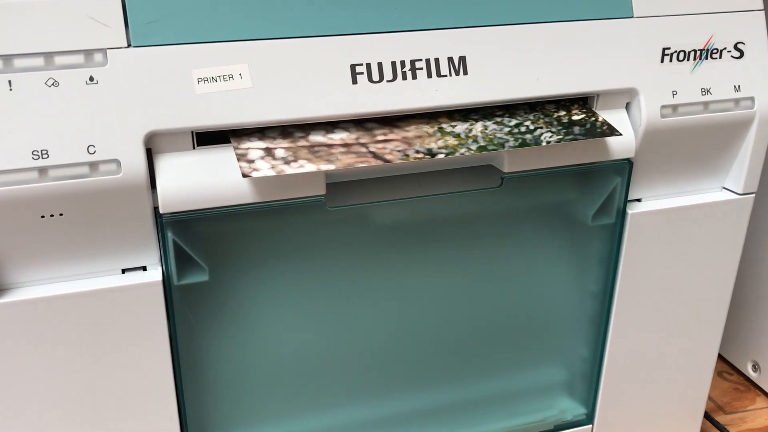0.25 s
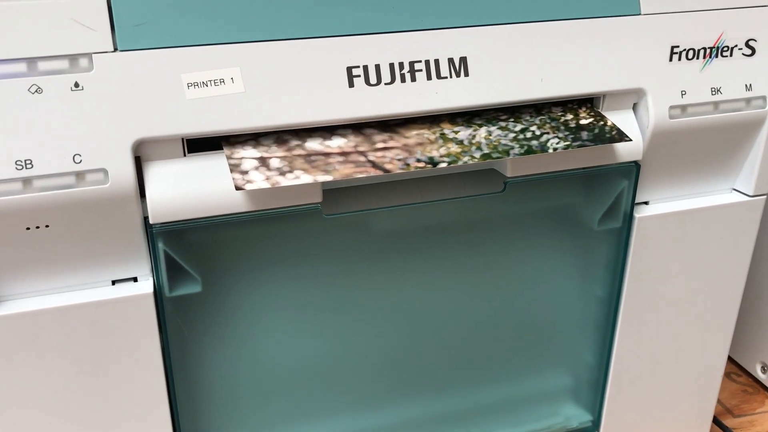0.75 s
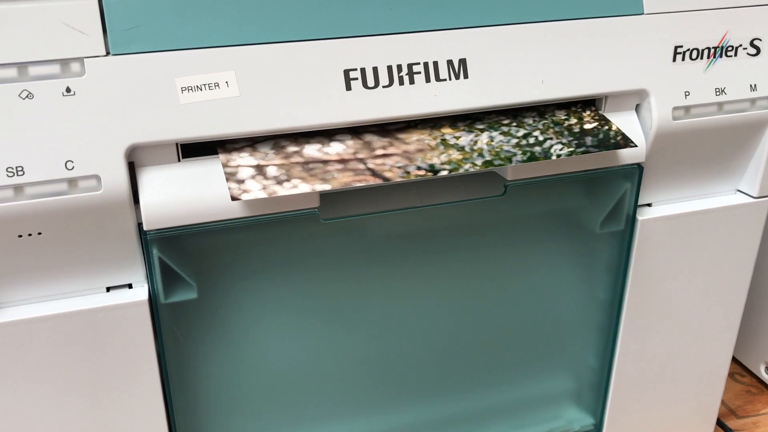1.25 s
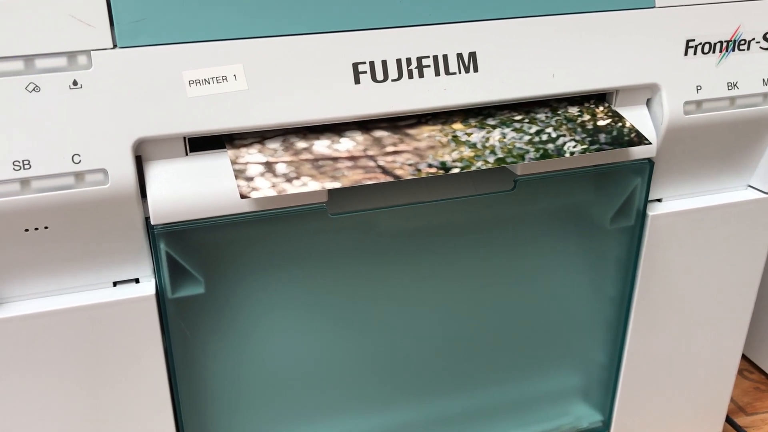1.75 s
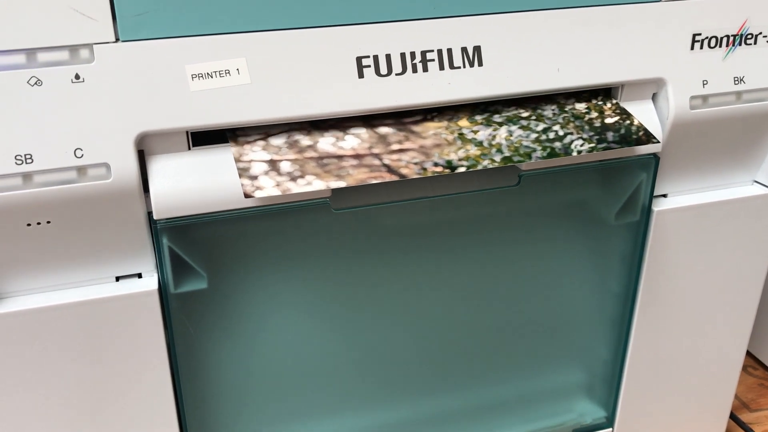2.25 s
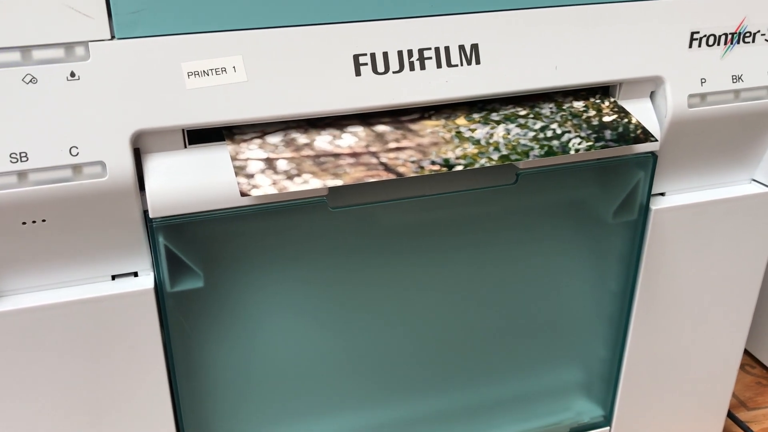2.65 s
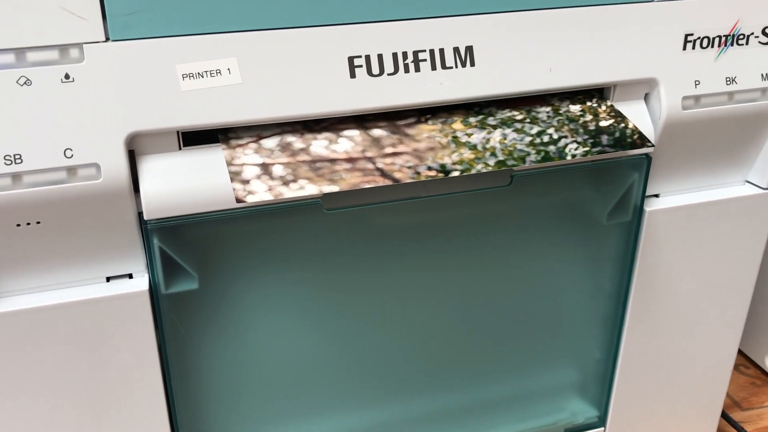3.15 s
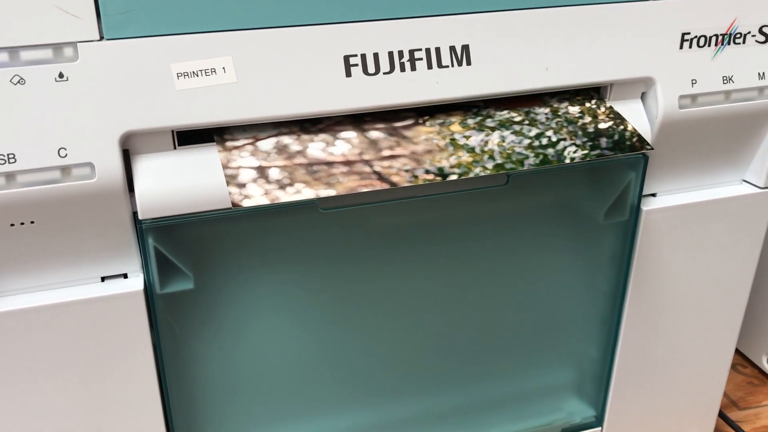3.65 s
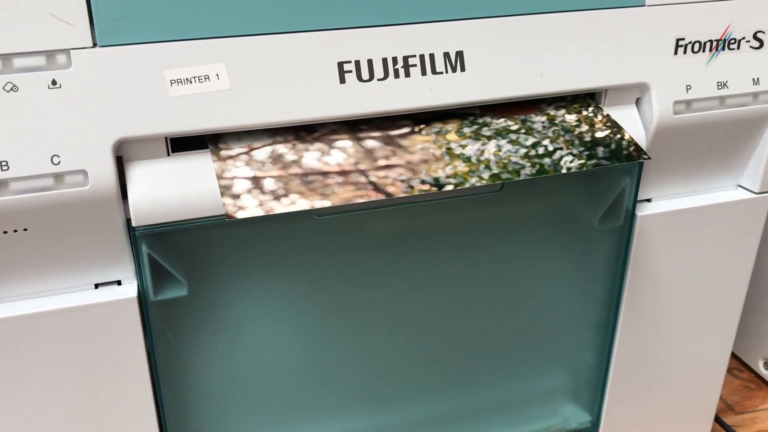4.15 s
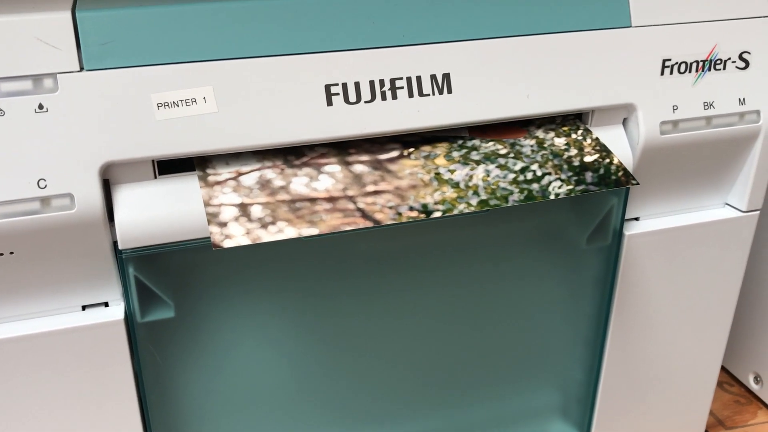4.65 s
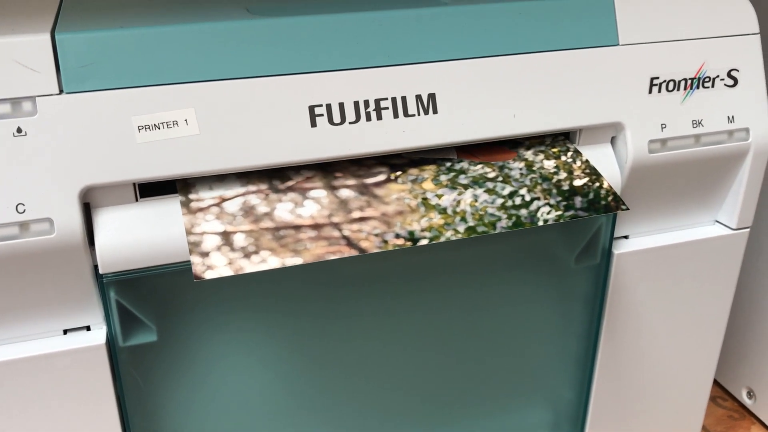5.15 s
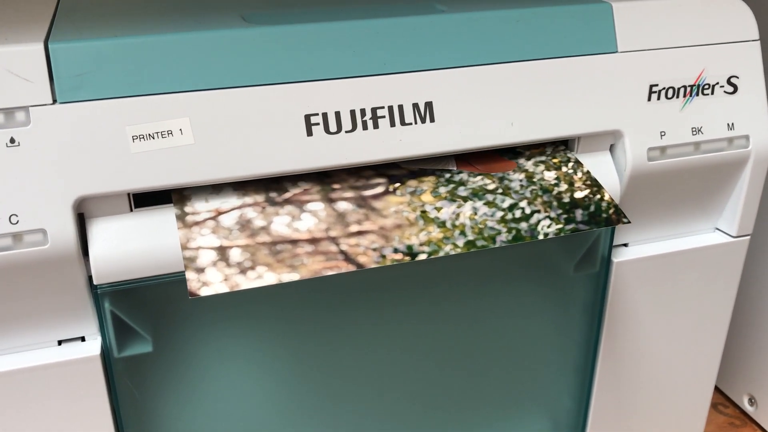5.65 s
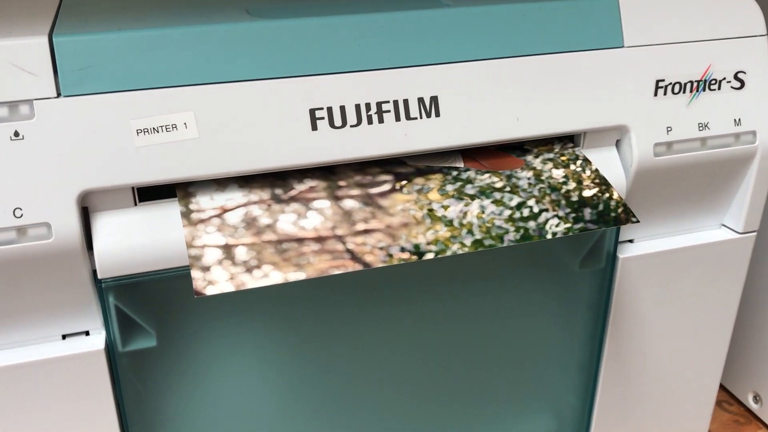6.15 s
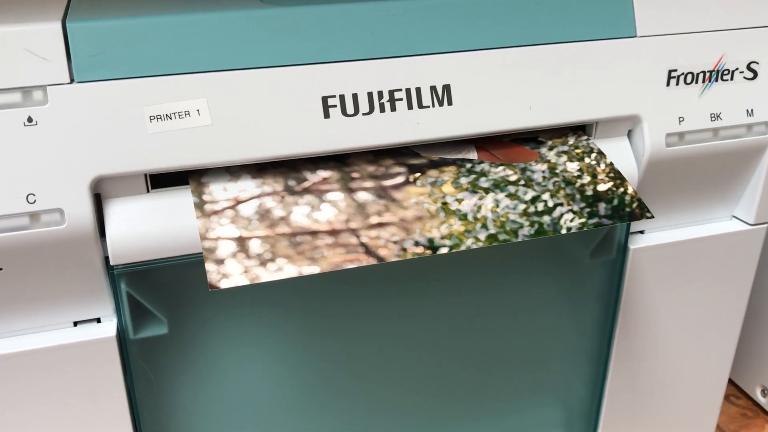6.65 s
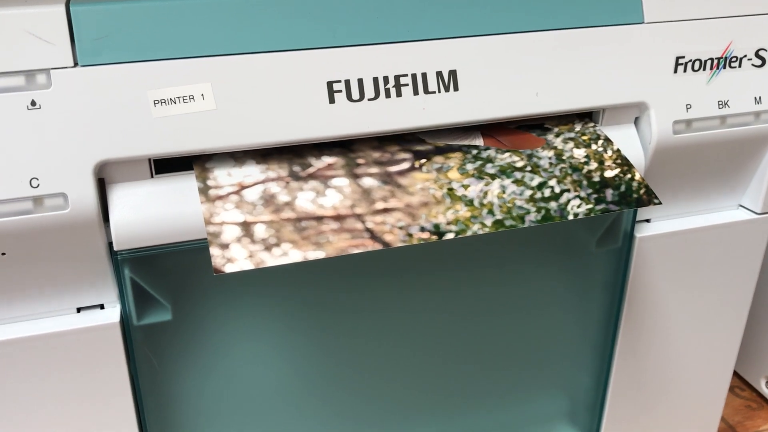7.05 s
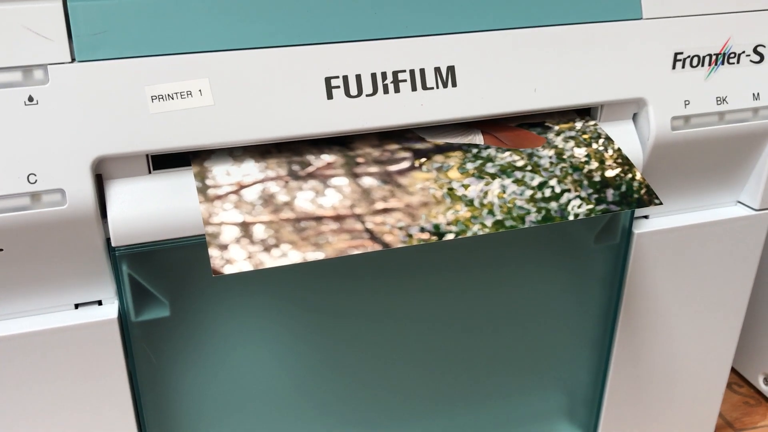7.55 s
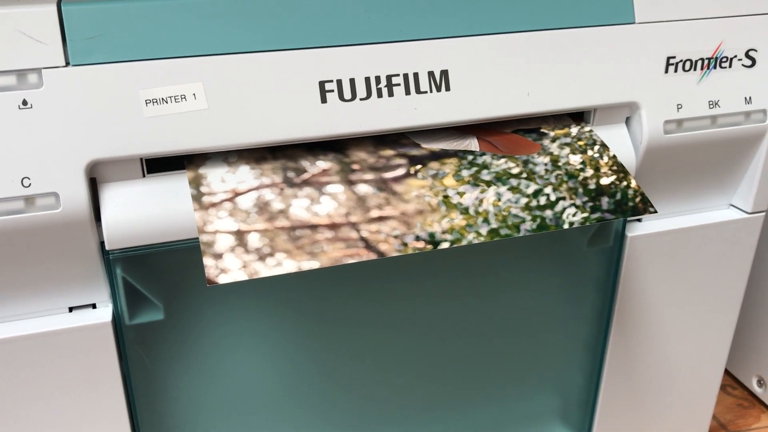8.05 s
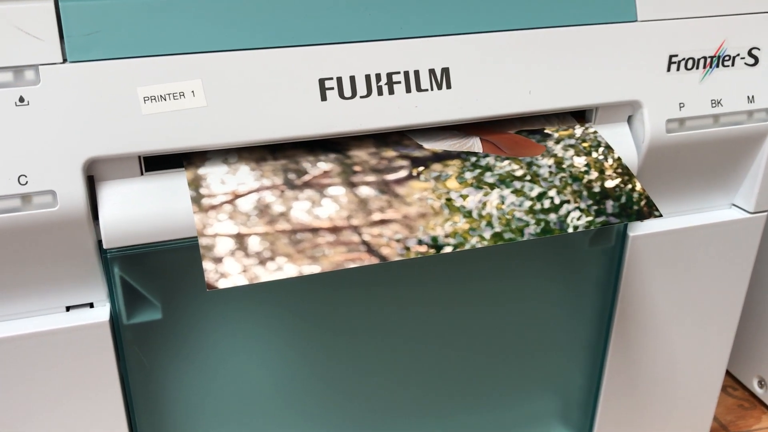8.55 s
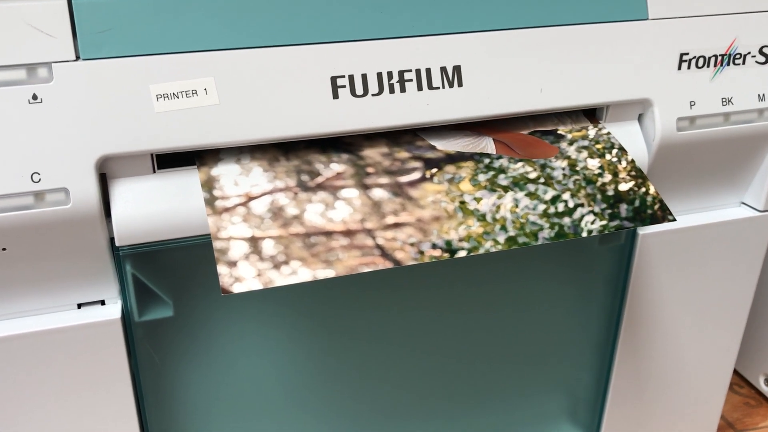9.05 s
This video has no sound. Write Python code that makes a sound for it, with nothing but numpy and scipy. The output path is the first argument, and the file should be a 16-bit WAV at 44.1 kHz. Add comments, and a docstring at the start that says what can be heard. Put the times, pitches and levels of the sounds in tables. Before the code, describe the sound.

A photo printer runs close to the microphone in a small room, already working at 0 s and continuing to the end at about 9.3 s. Two fans of almost equal speed give a low hum near 200 Hz and a fluttering, slightly beating whine near 1 kHz, surrounded by rushing air and fine hiss. The whine gets clearly stronger at about 1.6 s, and an airy high sheen grows until about 6 s. From 0.13 s, every 0.55 s, comes a very short grainy swish, then within a moment a faint bright tick of varying strength and a soft low thud with a rattle. Swishes are strongest around 4.6 s. From about 5.3 s a very low drone, like a distant engine, swells under the machine, climbs in pitch until about 7 s, drops back and fades by about 8.5 s, leaving the steady printing cycle.

```python
"""Inkjet photo printer, close up

Two cooling fans of nearly equal speed hum and whine as sums of sines; filtered noise is their rush of air.
About twice a second, as each head pass ends, come a short swish, a light tick and the soft thud of a paper
step: enveloped noise, with decaying sines for the tick. In the second half a low drone like a distant
engine, two gliding notes over a rumble, swells, climbs in pitch and fades."""
import sys
import numpy as np
from scipy import signal
from scipy.fft import rfft, irfft, next_fast_len
from scipy.io import wavfile
from scipy.ndimage import map_coordinates

SR = 44100
rng = np.random.default_rng(int(sys.argv[2]) if len(sys.argv) > 2 else 0)


def output_pcm(signal):
    """Save a mono or channel-first signal as 16-bit PCM at the path in sys.argv[1].

    Samples are clipped to [-1, 1] before scaling.
    """
    pcm = np.clip(np.atleast_2d(signal).T, -1, 1) * 32767
    wavfile.write(sys.argv[1], SR, np.round(pcm).astype(np.int16))


N = 410130
TIME = np.arange(N) / SR  # s


def from_db(db):
    """Turn decibels into gain."""
    return 10 ** (np.asarray(db) / 20)


def drift(rate):
    """Slow random wander with about `rate` changes a second, zero mean and spread 1."""
    hz = np.fft.rfftfreq(N, 1 / SR)
    lowpass = 1 / (1 + (hz / rate) ** 2) ** 2
    slow = irfft(rfft(rng.standard_normal(N)) * lowpass, N)
    return (slow - slow.mean()) / slow.std()


def tone(cycles, db):
    """A sine of given rms level that starts anywhere in its cycle."""
    phase = 2 * np.pi * (cycles + rng.random())
    return np.sqrt(2) * from_db(db) * np.sin(phase)


def lift(hz, resonances):
    """Decibels that bell-shaped resonances add at a frequency."""
    total_db = 0
    for centre, width, lift_db in resonances:
        distance = 2 * (hz - centre) / width
        total_db = total_db + lift_db * np.exp2(-np.minimum(distance ** 2, 20))
    return total_db


def noise(spectrum, resonances=()):
    """Noise of a given density, lifted or dipped by bell-shaped resonances."""
    size = next_fast_len(N)
    hz = np.maximum(np.fft.rfftfreq(size, 1 / SR), 1)
    points, levels = np.transpose(spectrum)
    db = np.interp(np.log(hz), np.log(points), levels)
    # beyond both ends of the table the level falls 20 dB an octave
    octaves_outside = np.abs(np.log2(hz / np.clip(hz, points[0], points[-1])))
    db = db - 20 * octaves_outside + lift(hz, resonances)
    shaped = irfft(rfft(rng.standard_normal(size)) * from_db(db), size)[:N]
    return shaped * np.sqrt(SR / 2)  # white noise at 0 dB per Hz before shaping


def bursts(events, rise_s, fall_s):
    """An envelope that rises and dies away after each event; the event level sets its peak."""
    envelope = np.zeros(N)
    age = np.arange(SR // 2) / SR
    shape = (1 - np.exp(-(age / rise_s) ** 2)) * np.exp(-age / fall_s)
    shape = shape / shape.max()
    for s, db in events:
        part = envelope[max(round(s * SR), 0):][:len(age)]
        part += from_db(db) * shape[:len(part)]
    return envelope


def in_time(rows):
    """Join the second column of a table over its times by straight lines."""
    seconds, values = np.transpose(rows)
    return np.interp(TIME, seconds, values)


# Whine as the vent faces the listener more or less openly; only the swing about its mean is used:
# (t/s, level/dB)
VENT_FACING = [(0.0, -47.5), (0.39, -46), (1.58, -46.5), (1.66, -42.5), (4.84, -42), (5.39, -40.5),
               (9.3, -41.5)]


def vent_swing():
    """Swing in dB of the whine as the vent turns towards or away from the listener."""
    whine_db = in_time(VENT_FACING)
    return whine_db - whine_db.mean()


# Tones of each five-bladed fan, rms before the vent swing and flutter:
# (multiple of the rotation rate, level/dB)
REAR_FAN_TONES = [(1, -47.5), (2, -68.5), (4, -67), (5, -49), (8, -65.5), (12, -66.5), (15, -69),
                  (16, -68.5)]
FRONT_FAN_TONES = [(1, -60), (5, -42), (8, -67), (10, -95), (12, -60.5), (15, -81), (16, -82), (20, -69)]
REAR_FAN_HZ, FRONT_FAN_HZ = 195.42, 202.03  # rotation rates


def fan(turn_hz, tones, whine_db, wander_turns, flutter_db):
    """Imbalance hums once a turn through the case; blades and motor whine out of the vent."""
    turns = turn_hz * TIME + wander_turns * drift(2.7)
    vent_db = whine_db + flutter_db * drift(7.7)
    out = np.zeros(N)
    for multiple, db in tones:
        through_vent = multiple > 2
        out += tone(multiple * turns, db + (vent_db if through_vent else 0))
    return out


# Faint steady tones of the drive, rms: (f/Hz, level/dB)
DRIVE_TONES = [(475.5, -70.5), (496, -63.5)]


def drive_tones():
    """The drive sings on faint sines whose phases wander a little."""
    return sum(tone(hz * TIME + 0.096 * drift(2.1), db) for hz, db in DRIVE_TONES)


def front_panel(x, lag_ms, sway_ms, echo_db):
    """A reflection off the front panel ripples the hiss as the listening point sways."""
    lag_s = (lag_ms + sway_ms * drift(.3)) / 1000
    echo = map_coordinates(x, [(TIME - lag_s) * SR], order=3)
    return x + from_db(echo_db) * echo


# Air rushing through the case, before swing and flutter: (f/Hz, level/dB per Hz)
RUSH = [(300, -92.5), (520, -84), (600, -80.5), (660, -74), (950, -69.5), (1100, -75), (1320, -82),
        (2100, -86.5), (3000, -89.5), (5000, -100)]
# Air resonances of the case: (f/Hz, width/Hz, lift/dB)
CAVITIES = [(685, 88, 5.5), (812, 46, 4.5), (1000.4, 68, 6.5), (1061, 56, 9), (1140, 25, -5), (1179, 91, 6),
            (1235, 45, 3.5), (1478, 204, 6), (1764, 78, 3.5), (1897, 74, 6), (2495, 150, 6),
            (2792, 91, 8.5)]
# Fine hiss at the grille, before the panel reflection: (f/Hz, level/dB per Hz)
HISS = [(1500, -105), (2900, -90), (3600, -88), (4500, -87.5), (5200, -90.5), (7400, -91.5), (8500, -95.5),
        (10500, -99), (12600, -99), (15700, -104)]
# Colour of the grille: (f/Hz, width/Hz, lift/dB)
GRILLE = [(3290, 140, -18), (3664, 190, 4), (4300, 61, 4.5), (5070, 120, -5), (5200, 130, 4),
          (5880, 250, -1.5), (6360, 350, -0.5), (8400, 450, 1), (10500, 500, -2)]
# Airy sheen beamed out of the paper slot, once fully up: (f/Hz, level/dB per Hz)
SHEEN = [(6000, -108), (10000, -111)]
# Resonances of the slot: (f/Hz, width/Hz, lift/dB)
SLOT = [(6400, 460, 17), (7260, 400, 17.5), (9570, 620, 13.5)]
# Low murmur of the machine and room: (f/Hz, level/dB per Hz)
MURMUR = [(20, -104), (35, -84), (52, -73.5), (75, -75), (98, -74.5), (125, -72.5), (160, -79), (200, -71),
          (255, -81), (380, -78), (450, -86.5), (800, -100)]
RUSH_FOLLOWS = 0.37  # share of the whine's swing in dB that the rush takes
SHEEN_START_DB, SHEEN_FULL_S = -16, 5.9


def airflow(whine_db):
    """Turbulence rings the cavities of the case and hisses at the grille and the slot."""
    rush = noise(RUSH, CAVITIES) * from_db(RUSH_FOLLOWS * whine_db + 0.62 * drift(14))
    hiss = front_panel(noise(HISS, GRILLE), lag_ms=2.6, sway_ms=0.049, echo_db=-14.0)
    # the sheen comes up evenly in dB as the paper coming out opens the slot
    sheen_db = SHEEN_START_DB * np.maximum(1 - TIME / SHEEN_FULL_S, 0)
    sheen = noise(SHEEN, SLOT) * from_db(sheen_db)
    return rush + hiss + sheen + noise(MURMUR)


FIRST_PASS_S, PASS_S = .1285, .5454  # end of the first head pass, time from one end to the next


def pass_ends():
    """The moments in seconds at which the print head turns round."""
    return np.arange(FIRST_PASS_S, N / SR, PASS_S)


# Spectrum of the swish, before its strength and envelope: (f/Hz, level/dB per Hz)
SWISH = [(2000, -82), (3500, -82.5), (4500, -74.5), (6500, -76.5), (8500, -79), (9800, -82), (11500, -91),
         (15500, -100)]
# Strength of the swishes as the print goes on: (t/s, level/dB)
SWISH_STRENGTH = [(.13, -8), (.67, -1.5), (1.76, -9.5), (2.86, -3.5), (4.6, 0), (5.6, -5.5), (8.3, -7.5),
                  (8.86, -3.5)]
# The case nudged as the head brakes, at the peak of the bump: (f/Hz, level/dB per Hz)
BUMP = [(180, -80), (260, -72), (420, -75.5), (600, -91)]


def head_turns():
    """A brief grainy swish at the end of each pass, and a faint bump as the head brakes."""
    ends = pass_ends()
    strengths_db = np.interp(ends, *np.transpose(SWISH_STRENGTH))
    rub = bursts(zip(ends, strengths_db), rise_s=.004, fall_s=.0068)
    grain = from_db(1.4 * drift(700))
    swish = noise(SWISH) * rub * grain
    bump = noise(BUMP) * bursts([(s, 0) for s in ends], rise_s=0.0037, fall_s=0.018)
    return swish + bump


# Ticks as the feed gear takes up its play, before the gains of the parts: (t/s, level/dB)
TICKS = [(0.1725, -26), (0.7214, -30), (1.2511, -39), (1.8016, -36.5), (2.3493, -30.5), (2.8977, -31),
         (3.4435, -28), (3.9719, -37), (4.533, -28), (5.0759, -34), (5.6238, -27.5), (6.1747, -27),
         (6.6994, -42), (7.2509, -37), (7.797, -32), (8.354, -28.5), (8.887, -33)]
# Ring of the small hard part that ticks, before tick level and gain: (f/Hz, level/dB, t60/s)
SNAP_MODES = [(8800, -31.5, 0.0047), (10100, -29, 0.0053), (11200, -32, .004), (12100, -39, .004),
              (13900, -42, .005)]
# The tick scattered inside the case, before tick level and gain: (f/Hz, level/dB per Hz)
SCATTER = [(3000, -79), (4500, -83), (5700, -82), (6500, -70), (7200, -80), (7800, -86), (8900, -77),
           (9900, -73.5), (11500, -80.5), (13000, -83), (13800, -84), (15700, -90)]
# The case under a tick, before tick level and gain: (f/Hz, level/dB per Hz)
KNOCK = [(200, -70), (400, -69.5), (1000, -64.5), (1800, -72.5), (3000, -81), (4500, -81), (7000, -94)]
SNAP_DB, SCATTER_DB, KNOCK_DB = 27, 27, 27.5  # gains of the three parts


def gear_ticks():
    """A bright snap with a short noisy scatter; the case answers with a duller knock."""
    clicks = np.zeros(N)
    for s, db in TICKS:
        clicks[round(s * SR)] = from_db(db)
    age = np.arange(SR // 20) / SR
    ring = np.zeros(len(age))
    for k, (hz, db, t60) in enumerate(SNAP_MODES):
        sign = (-1) ** k  # neighbouring modes start in opposite directions
        ring += sign * from_db(db - 60 * age / t60) * np.sin(2 * np.pi * hz * age)
    snap = signal.oaconvolve(clicks, ring)[:N]
    scatter = noise(SCATTER) * bursts(TICKS, rise_s=0.00055, fall_s=0.0068)
    knock = noise(KNOCK) * bursts(TICKS, rise_s=0.002, fall_s=0.0097)
    return snap * from_db(SNAP_DB) + scatter * from_db(SCATTER_DB) + knock * from_db(KNOCK_DB)


# Rattle of a paper step, before roller speed and grain: (f/Hz, level/dB per Hz)
STEP_RATTLE = [(70, -99), (150, -62), (200, -64.5), (275, -71.5), (370, -66), (480, -81.5), (680, -66.5),
               (1250, -81.5), (1550, -81.5), (2200, -81.5), (3500, -87.5), (8000, -102)]
# The case booming on after a step, at the peak of the boom: (f/Hz, level/dB per Hz)
BOOM = [(90, -82), (140, -66), (260, -74), (350, -89)]
STEP_LAG_S = 0.063  # from the pass end to the rollers' full speed


def paper_steps(speed_up_s, slow_down_s, grain_db):
    """After each pass the rollers speed up and stop, rattling the case; its lows boom on."""
    steps = pass_ends() + STEP_LAG_S
    speed = np.zeros(N)
    for s in steps:
        lag = TIME - s
        slope_s = np.where(lag < 0, speed_up_s, slow_down_s)
        speed += 1 / np.cosh(np.clip(lag / slope_s, -20, 20))
    rattle = noise(STEP_RATTLE) * speed * from_db(grain_db * drift(150))
    boom = noise(BOOM) * bursts([(s, 0) for s in steps], rise_s=0.019, fall_s=0.042)
    return rattle + boom


def swell(full_s, until_s, attack_s, release_s):
    """Attack, hold and release; each slope takes its time for 20 dB."""
    attack = np.maximum(full_s - TIME, 0) / attack_s
    release = np.maximum(TIME - until_s, 0) / release_s
    return from_db(-20 * (attack + release))


# A note booms where it glides through a mode of the room: (f/Hz, width/Hz, lift/dB)
ROOM_MODES = [(54.6, 6.8, 8), (73, 6.6, 3.5), (85.8, 4.7, 13)]


def drone_note(pitch, level_db, growth_db_per_s, octave_db):
    """A gliding low note that booms in the modes of the room, with a weak octave that does not."""
    hz = in_time(pitch)
    cycles = np.cumsum(hz) / SR
    start_s = pitch[0][0]
    db = level_db + growth_db_per_s * (TIME - start_s) + 1.8 * drift(10)
    return tone(cycles, db + lift(hz, ROOM_MODES)) + tone(2 * cycles, db + octave_db)


# Pitch glides of the upper and the lower note: (t/s, f/Hz)
HIGH_GLIDE = [(5.3, 51), (5.43, 52.6), (5.58, 64), (5.8, 71.7), (6.42, 82.1), (7.06, 89.3), (7.19, 74.9),
              (7.3, 66)]
LOW_GLIDE = [(5.8, 46.35), (6.9, 54.15), (7.3, 52.2), (7.65, 56.4), (8.03, 49.9), (8.2, 40.7)]
# Dull rumble under the notes, before its gain and swell: (f/Hz, level/dB per Hz)
RUMBLE = [(60, -75), (105, -77), (130, -59), (160, -73), (185, -70), (201, -57), (222, -74), (350, -90)]


def drone():
    """Two low notes climb and drop back over a dull rumble, each under its own swell."""
    high = drone_note(HIGH_GLIDE, level_db=-57.5, growth_db_per_s=3, octave_db=-8)
    high *= swell(full_s=5.38, until_s=7.24, attack_s=.1, release_s=.1)
    low = drone_note(LOW_GLIDE, level_db=-57, growth_db_per_s=0.0, octave_db=-10)
    low *= swell(full_s=6.1, until_s=8.33, attack_s=.4, release_s=0.27)
    rumble = noise(RUMBLE) * from_db(-3.5)
    rumble *= swell(full_s=5.6, until_s=7.05, attack_s=.3, release_s=0.95)
    return high + low + rumble


def scene():
    """Fans, drive, air, the printing cycle and the drone, in one channel."""
    whine_db = vent_swing()
    rear = fan(REAR_FAN_HZ, REAR_FAN_TONES, whine_db, wander_turns=0.0033, flutter_db=3.0)
    front = fan(FRONT_FAN_HZ, FRONT_FAN_TONES, whine_db, wander_turns=0.0064, flutter_db=1.1)
    steps = paper_steps(speed_up_s=0.015, slow_down_s=0.025, grain_db=-0.5)
    printing = head_turns() + gear_ticks() + steps
    mix = rear + front + drive_tones() + airflow(whine_db) + printing + drone()
    return mix[None]


CUTOFF_HZ = 15800


def record(dry):
    """Cut the top steeply above the cutoff."""
    lowpass = signal.ellip(12, .1, 70, CUTOFF_HZ, fs=SR, output="sos")
    return signal.sosfilt(lowpass, dry)


dry = scene()
out = record(dry)
output_pcm(out)
```